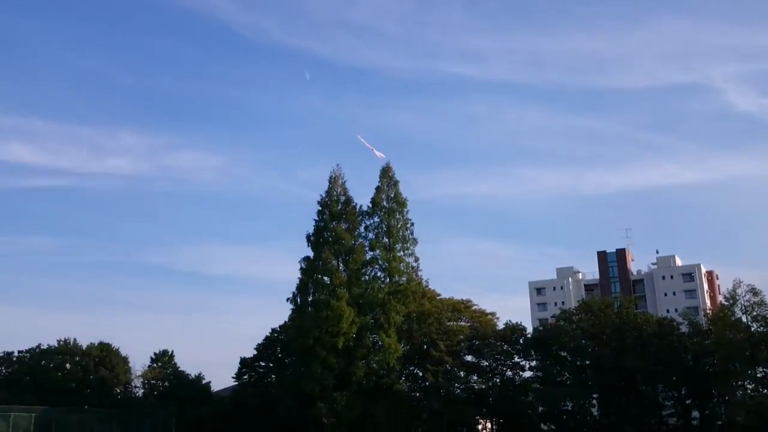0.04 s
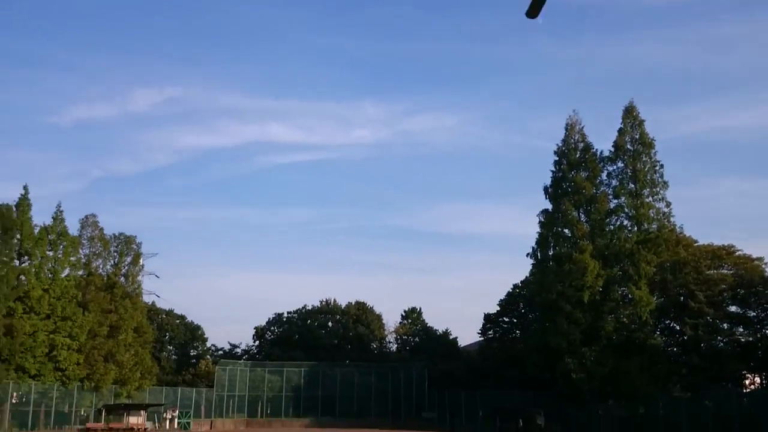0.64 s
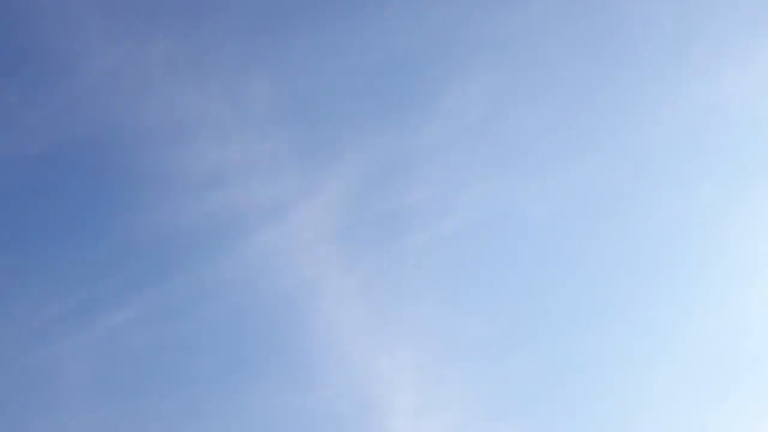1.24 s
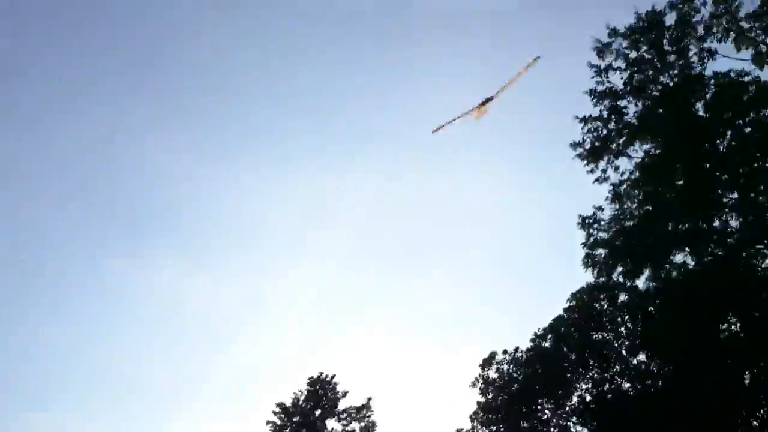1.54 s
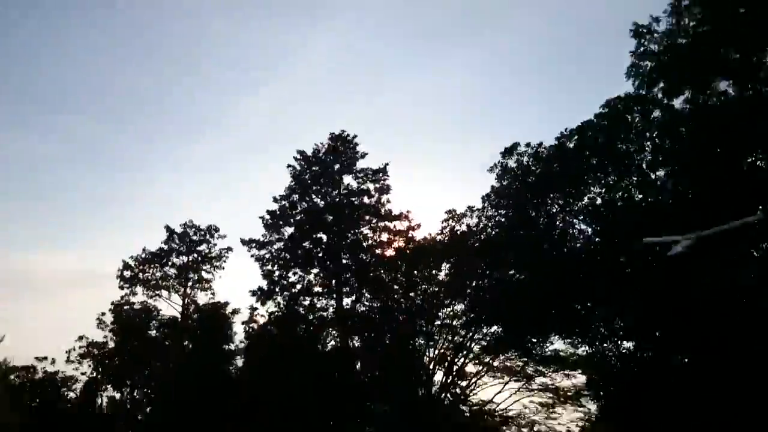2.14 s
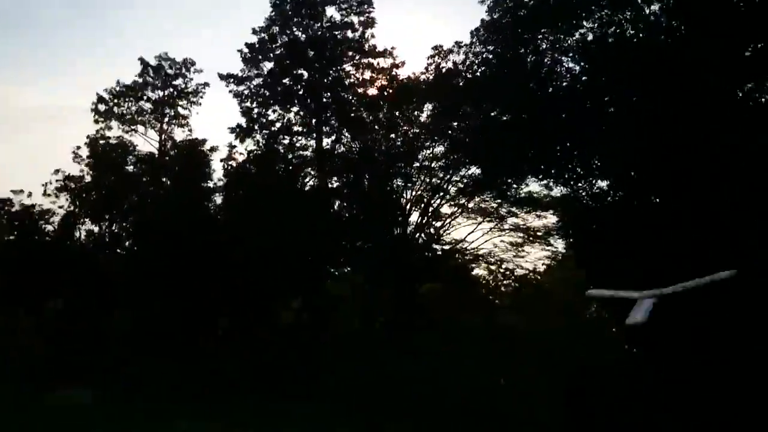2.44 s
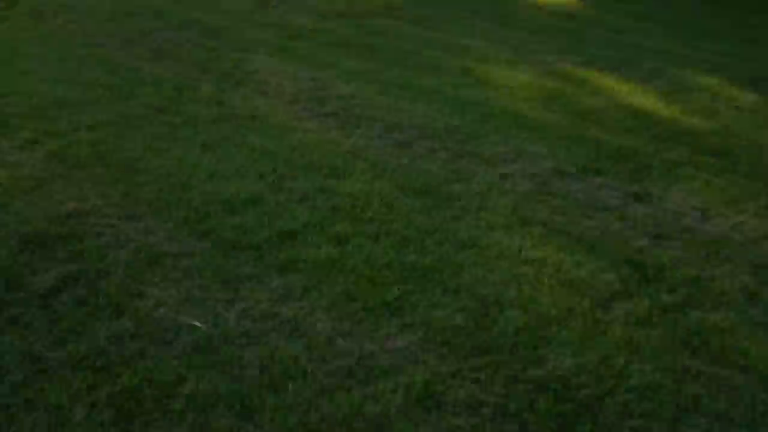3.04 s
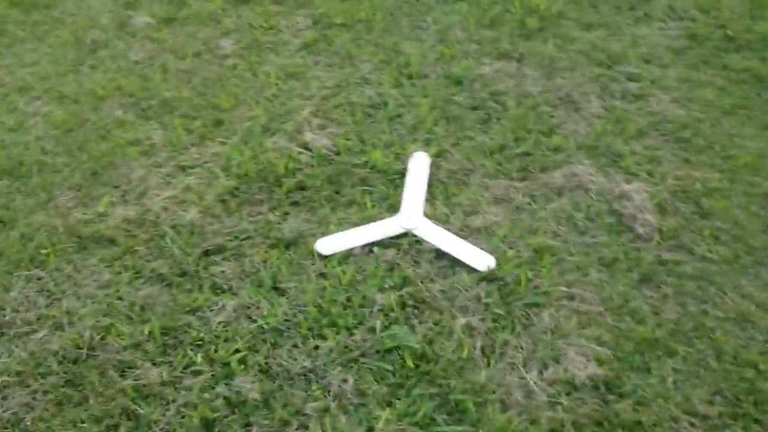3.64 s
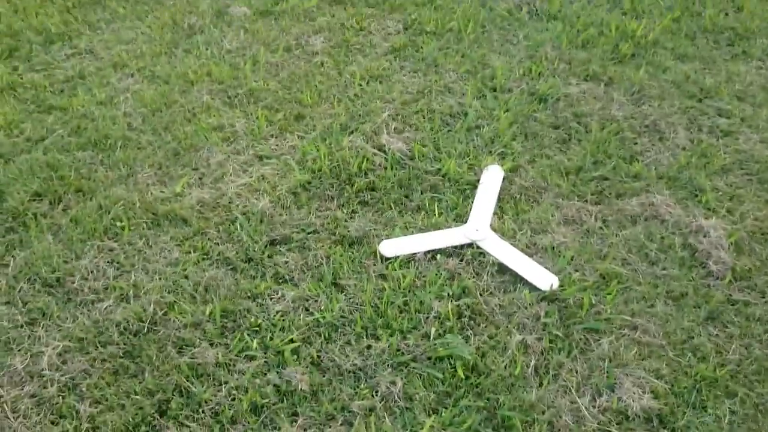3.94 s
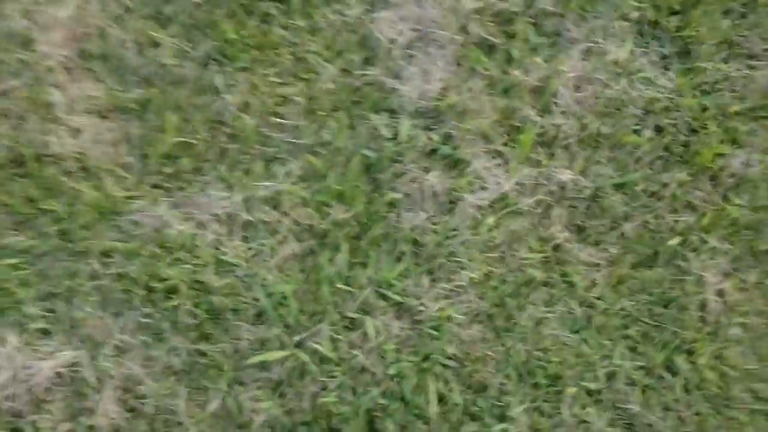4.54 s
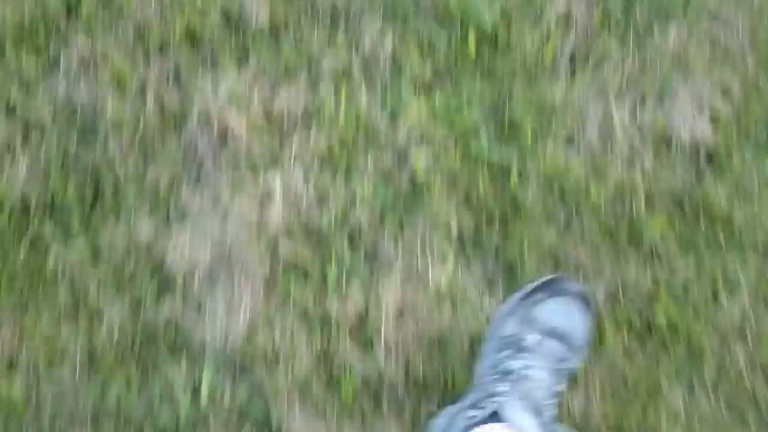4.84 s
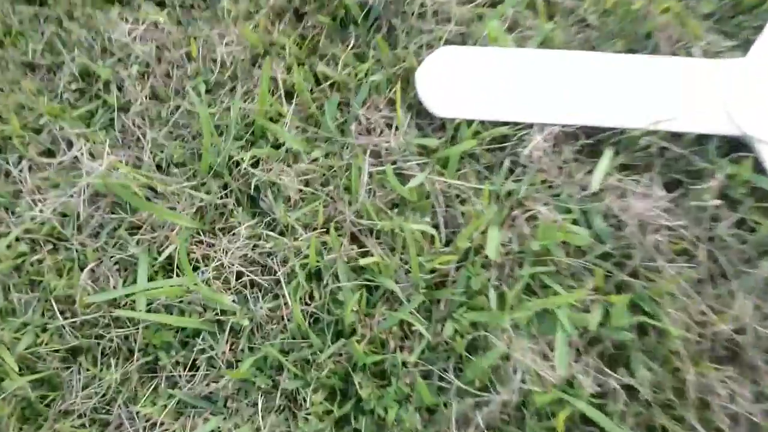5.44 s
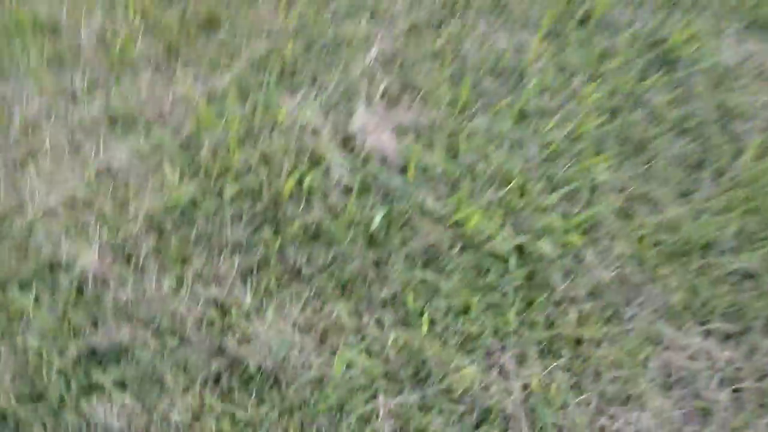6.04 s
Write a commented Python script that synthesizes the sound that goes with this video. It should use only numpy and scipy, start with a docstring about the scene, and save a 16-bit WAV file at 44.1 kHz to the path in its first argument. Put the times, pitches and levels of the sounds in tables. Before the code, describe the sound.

Wind buffets a hand-held stereo microphone throughout, in low, uneven rumbles and thumps that shift between sides, over a faint park hush and distant throbbing crickets. A strong gust hits the left around 0.3 seconds, a softer one the right near 1.9, and a finger bumps the microphone at 2.9. At 3.4 seconds a boomerang lands on the left with sharp ticks and a brief hissing skid through grass, along with more wind thumps. From 4 seconds clothes swish, and the far crickets give way to one soft, nearer trill. Loud finger knocks hit the right side at 4.5 and 4.8 seconds; the finger slides off and that side becomes clearer. Strong gusts follow from 5 to 5.6 seconds, with light shoe scuffs and dry stalk snaps near 5.1 and 5.4. Grass blades hiss from 5.7 to 6.1 as the boomerang is lifted, with one more snap around 6 seconds.

```python
"""Gusts buffet the two microphone ports of a swinging hand-held camera, over crickets and a far park hush.
A boomerang thrown on the evening lawn lands and skids through the grass. Clothes rustle, a shoe scuffs,
stalks snap and blades hiss as the thrower bends to fetch it. A finger muffles the right port, bumps the
housing and slides off; a near cricket takes over from the far ones."""
import sys
import numpy as np
from scipy import signal
from scipy.fft import rfft, irfft, next_fast_len
from scipy.io import wavfile
from scipy.ndimage import uniform_filter1d

SR = 44100
rng = np.random.default_rng(int(sys.argv[2]) if len(sys.argv) > 2 else 0)


def store_pcm(level_fs):
    """Save levels as 16-bit WAV."""
    pcm = np.round(np.clip(level_fs, -1, 1) * 32767).astype(np.int16)
    wavfile.write(sys.argv[1], SR, np.atleast_2d(pcm).T)


N = 276948
TIME_S = np.arange(N) / SR


def from_db(db):
    return 10 ** (np.asarray(db) / 20)


def unit_rms(x):
    return x / np.sqrt(np.mean(x ** 2) + 1e-20)


def curves(rows):
    """Each column interpolated over the times in the first."""
    times_s, *columns = np.transpose(rows)
    return [np.interp(TIME_S, times_s, column) for column in columns]


def swell(t_s, rise_s, hold_s, fall_s, power=1):
    """Full level from t_s; rise and fall each span 20 dB. Power 2 rounds the top."""
    flank = np.maximum(t_s - TIME_S, 0) / rise_s + np.maximum(TIME_S - t_s - hold_s, 0) / fall_s
    return from_db(-20 * flank ** power)


def drift(per_s):
    """Random wander, unit RMS."""
    knots = rng.standard_normal(N // 10)
    return unit_rms(np.interp(TIME_S * per_s, np.arange(len(knots)), knots))


def sine(hz):
    return np.sin(2 * np.pi * np.cumsum(hz) / SR)


def pan(side_db):
    """L and R gains from L-R; the louder side stays at 1."""
    return from_db([[min(side_db, 0)], [min(-side_db, 0)]])


def stereo_noise(coherence):
    common = np.sqrt(coherence) * rng.standard_normal(N)
    return common + np.sqrt(1 - coherence) * rng.standard_normal((2, N))


def colour(x, spectrum):
    """Filter by an outline of f/Hz, gain/dB."""
    hz, db = np.transpose(spectrum)
    size = next_fast_len(N)
    grid_hz = np.maximum(np.fft.rfftfreq(size, 1 / SR), 1)
    gain = from_db(np.interp(np.log(grid_hz), np.log(hz), db))
    return irfft(rfft(x, size) * gain, size)[..., :N]


def butter(x, hz, kind, order=2):
    return signal.sosfilt(signal.butter(order, hz, kind, fs=SR, output="sos"), x)


def resonate(x, hz, width_hz):
    r = np.exp(-np.pi * width_hz / SR)
    gain = (1 - r * r) / 2
    feedback = [1, -2 * r * np.cos(2 * np.pi * hz / SR), r * r]
    return signal.lfilter([gain, 0, -gain], feedback, x + 1e-18)


def band(x, hz, stage_width_hz):
    """Two equal resonators in series, unit RMS out."""
    return unit_rms(resonate(resonate(x, hz, stage_width_hz), hz, stage_width_hz))


def friction(spectrum, grain_db, coherence, slips_per_s=500):
    """Countless tiny uneven slips, coloured by what rubs."""
    slips = stereo_noise(coherence) * from_db(grain_db * drift(slips_per_s))
    return unit_rms(colour(slips, spectrum))


def puff(clicks, corner_hz):
    """Each click becomes a rounded pressure pulse."""
    return signal.sosfilt(signal.bessel(8, corner_hz, fs=SR, output="sos"), clicks + 1e-18)


def eddy(clicks, corner_hz):
    """A passing eddy pushes, then draws the air back."""
    return butter(puff(clicks, corner_hz), .27 * corner_hz, "high", order=1)


def mic_low_cut(x, hz=64, q=1.8):
    """The microphone's bass cut swings back after every pulse."""
    w = 2 * np.pi * hz / SR
    ringing = signal.lfilter(*signal.bilinear([1, 0, 0], [1, w / q, w * w], 1), x)
    return butter(ringing, 13, "high", order=1)


def pressure_pulses(table, shape, alternate):
    """Single pulses on the ports, placed and scaled by their peaks."""
    out = np.zeros((2, N))
    click = signal.unit_impulse(4096)
    for k, (t_s, db, corner_hz, side_db) in enumerate(table):
        pulse = mic_low_cut(shape(click, corner_hz))
        start = round(t_s * SR) - pulse.argmax()
        sign = (-1) ** k if alternate else 1
        out[:, start:start + len(click)] += sign * from_db(db) * pan(side_db) * pulse / pulse.max()
    return out


# Eddy sizes: corner/Hz, rate/(1/s), weight in strong wind/dB, loss in weaker wind/(dB/dB)
EDDY_SIZES = [(121.5, 820, 1, 1), (254, 170, 3, 1.76), (464, 70, -9.5, 2.17)]

def port_turbulence(flow_db, strong_db=-26, flutter_db=2.2):
    """Eddies hit one port; stronger flow brings more of the small, sharp ones."""
    lull_db = np.maximum(strong_db - flow_db, 0)
    rumble = 0
    for corner_hz, per_s, db, loss in EDDY_SIZES:
        clicks = (rng.random(N) < per_s / SR) * rng.uniform(-.88, 1, N)
        rumble += unit_rms(mic_low_cut(eddy(clicks, corner_hz))) * from_db(db - loss * lull_db)
    local_power = uniform_filter1d(uniform_filter1d(rumble ** 2, size=1500), size=1500)
    steady = rumble / np.sqrt(local_power + 1e-12)
    return steady * from_db(flow_db + flutter_db * drift(per_s=40))   # gusts break into puffs


# Gusts: t/s, rise/s, hold/s, fall/s, level/dB, L-R/dB
WIND_GUSTS = [(0.095, 0.11, 0.037, 0.033, -35, 8), (0.294, 0.089, 0.053, 0.16, -26, 36),
              (0.304, .3, 0.23, 0.3, -43.5, -17), (0.625, .06, 0.018, 0.17, -38.5, 18),
              (1.646, .025, 0.49, 0.22, -45, -3), (1.858, 0.23, 0.053, 0.24, -30, -13.5),
              (2.227, 0.03, 0.025, 0.15, -35.5, 13), (2.381, 0.043, 0.23, .04, -40, 3),
              (2.49, 0.047, .025, 0.042, -36.5, 17), (2.661, 0.022, .11, .12, -45, -1.5),
              (2.915, 0.062, 0.013, 0.12, -38, -2), (3.406, 0.11, 0.065, 0.063, -32, 16),
              (3.475, 0.16, 0.053, 0.5, -42, 2.5), (4.411, 0.049, 0.063, 0.33, -34.5, -7.5),
              (4.763, 0.031, 0.17, .13, -36, -10), (4.978, 0.055, 0.062, .12, -24.5, -10.5),
              (5.165, 0.082, 0.1, 0.26, -29, -2.5), (5.354, 0.051, .11, 0.068, -30, -15),
              (5.581, 0.075, 0.019, 0.2, -33.5, -16), (6.006, 0.23, .06, 0.075, -45.5, 16)]

def wind(calm_db=(-65, -55)):
    """Gusts add their power to the calm air at each port (L, R); the lee port gets less."""
    gust_power = sum((from_db(db) * pan(side_db) * swell(*shape, power=2)) ** 2
                     for *shape, db, side_db in WIND_GUSTS)
    flows_db = 10 * np.log10(gust_power + from_db(calm_db)[:, None] ** 2)
    return np.array([port_turbulence(flow_db) for flow_db in flows_db])


# Sharp eddies: t/s, peak/dB, corner/Hz, L-R/dB
WIND_JOLTS = [(.024, -29, 210, 32), (.58, -33.5, 204, -24), (2.13, -34.5, 136, -4), (1.645, -33, 240, 14),
              (3.573, -32.5, 240, 8), (.412, -22, 204, 28), (.233, -22.5, 318, 31), (.312, -15.5, 286, 39),
              (.352, -25.5, 960, 33), (.359, -14.5, 384, 32), (3.4205, -23, 330, 31),
              (3.445, -20.5, 574, 40), (3.4562, -16.5, 400, 40), (3.4794, -17.5, 343, 38),
              (4.4185, -24, 336, -30), (4.5185, -23, 298, 20), (4.979, -26, 296, -30),
              (5.043, -22.5, 406, -27), (5.052, -16.5, 306, -37), (5.107, -17.5, 457, -36),
              (5.248, -20.5, 307, 24), (5.328, -21, 332, -19), (5.617, -27, 239, -21)]

def wind_jolts():
    """Single sharp eddies thump the ports."""
    return pressure_pulses(WIND_JOLTS, eddy, alternate=False)


# Far park: f/Hz, gain/dB
PARK_SPECTRUM = [(150, 9.5), (400, -6), (900, 1.5), (1500, -0.5), (3000, -5.5), (4400, -3.5), (6400, -4),
                 (7300, -22.5), (8800, -16.5), (10300, -31), (12000, -24), (15800, -72)]

def park_hush():
    """Steady, wide noise of the distant park."""
    return from_db(-56) * unit_rms(colour(stereo_noise(coherence=.038), PARK_SPECTRUM))


# Chorus tones: f/Hz, weight/dB
CHORUS_TONES = [(4940, -2), (5135, 1), (5280, 0), (5470, -1), (5810, -5), (6160, -2)]
# Chorus fade: t/s, level/dB
CHORUS_FADE = [(0, -64), (3.7, -63.5), (6.28, -117)]

def far_crickets(waver_hz=24, haze_db=-2, throb_hz=14.47):
    """Wavering tones chirp in step over a haze of more distant singers."""
    level_db, = curves(CHORUS_FADE)
    song = sum(from_db(db) * np.array([sine(hz + waver_hz * drift(120)) for _ in range(2)])
               for hz, db in CHORUS_TONES)
    haze = unit_rms(butter(rng.standard_normal((2, N)), [5100, 6500], "band", order=4))
    throb = 1 + .62 * np.cos(2 * np.pi * throb_hz * (TIME_S - .04))
    return from_db(level_db) * unit_rms(song + from_db(haze_db) * haze) * throb


# Covered port: f/Hz, gain/dB
COVERED_RESPONSE = [(100, -5.5), (500, -4.5), (1200, -17.5), (3000, -6), (6000, -34), (12000, -4)]

def finger_muffle(x, opens_s=4.83, slide_s=.076):
    """A finger muffles the right port until it slides away."""
    left, right = x
    uncovered = np.clip((TIME_S - opens_s) / slide_s, 0, 1)
    return np.array([left, uncovered * right + (1 - uncovered) * colour(right, COVERED_RESPONSE)])


# Cloth body, swish and crisp top: f/Hz, gain/dB
BODY_SPECTRUM = [(450, -0.5), (900, -5), (1350, -6.5), (1900, -3), (2500, -5), (3800, -26.5)]
SWISH_SPECTRUM = [(2000, -17), (3300, -1), (3850, -2.5), (4400, -1), (5700, -0.5), (7000, -8), (9000, -26),
                  (11000, -38)]
CRISP_SPECTRUM = [(6000, -1.5), (8500, 6), (10000, -3), (12300, 13), (14000, 2), (15800, 9)]
# Walking up and bending, before trim: t/s, body/dB, swish/dB, crisp/dB
CLOTH_SLIDING = [(3.9, -100, -96, -98), (4.3, -84, -62, -89), (4.7, -63, -52, -67),
                 (5.0, -56, -50.5, -54.5), (5.3, -50.5, -46, -51.5), (5.5, -50, -43, -48.5),
                 (5.66, -64, -57.5, -58), (5.8, -73, -49, -56), (6.28, -82, -50, -48.5)]
# Quick limb moves, before trim: t/s, rise/s, hold/s, fall/s, level/dB, crisp re level/dB
LIMB_STROKES = [(0.392, 0.088, 0.018, 0.14, -60, -3), (0.58, 0.37, 0.13, 0.45, -58.5, -21),
                (4.502, 0.098, 0.033, 0.24, -54, -11), (4.754, 0.074, 0.048, 0.12, -56.5, -13),
                (5.143, .025, 0.02, 0.048, -44, -19), (5.387, 0.025, 0.02, 0.043, -46.5, 8)]

def cloth_rustle(trim_db=-1, side_db=3):
    """Folds give the body, sliding cloth the swish, its fibres the crisp top."""
    body, swish, crisp = from_db(curves(CLOTH_SLIDING))
    strokes = sum(from_db(db) * swell(*shape) for *shape, db, _ in LIMB_STROKES)
    tops = sum(from_db(db + top_db) * swell(*shape) for *shape, db, top_db in LIMB_STROKES)
    out = np.hypot(body, strokes) * friction(BODY_SPECTRUM, grain_db=1.5, coherence=.72)
    out += np.hypot(swish, strokes) * friction(SWISH_SPECTRUM, grain_db=1, coherence=.033)
    out += np.hypot(crisp, tops) * friction(CRISP_SPECTRUM, grain_db=1, coherence=.073)
    return from_db(trim_db) * out * pan(side_db)


def crackles(table, coherence):
    """Short bursts of slips, each in its own resonance."""
    out = 0
    for t_s, db, hz, width_hz, decay_s, side_db in table:
        burst = band(stereo_noise(coherence), hz, .64 * width_hz)
        envelope = (TIME_S >= t_s) * np.exp(-abs(TIME_S - t_s) / decay_s)
        out += from_db(db) * pan(side_db) * envelope * burst
    return out


# Fingertip crunches: t/s, level/dB, f/Hz, nominal width/Hz, decay/s, L-R/dB
FINGER_CRUNCHES = [(.562, -50, 730, 2520, 0.034, -30), (4.492, -40.5, 4050, 2400, 0.027, 23),
                   (4.501, -42, 545, 506, 0.048, -16), (4.8238, -19, 1020, 1730, 0.0029, -34),
                   (4.823, -29, 3200, 2980, 0.0037, -24), (4.8305, -32.5, 890, 2000, 0.0062, -32)]

def finger_crunches():
    """The fingertip crunches against the port."""
    return crackles(FINGER_CRUNCHES, coherence=1)


# Finger bumps: t/s, peak/dB, corner/Hz, L-R/dB
FINGER_BUMPS = [(2.8621, -20.5, 696, -35), (2.865, -30.5, 164.3, -32), (4.4982, -7.5, 750, -36),
                (4.5, -9.5, 537, -32), (4.8235, -5, 1150, -50), (4.825, -8, 288, -49),
                (4.831, -12, 630, -47)]

def finger_bumps():
    """The finger presses and releases the right port in turn."""
    return pressure_pulses(FINGER_BUMPS, puff, alternate=True)


# Sliding contact: f/Hz, gain/dB
SKID_SPECTRUM = [(1500, -14.5), (3000, -23), (3700, -12.5), (5670, -11), (7850, -17), (11000, -18.5),
                 (12100, -9), (15800, -13.5)]

def skids(table, ring_width_hz, low_cut_hz):
    """Crackly friction plus one resonance per touch, under a force that swells and dies."""
    slips = friction(SKID_SPECTRUM, grain_db=2.5, coherence=1, slips_per_s=3000)
    rub = unit_rms(butter(slips, low_cut_hz, "high"))
    blur = butter(rng.standard_normal(N), ring_width_hz / 2, "low")
    out = 0
    for t_s, db, rise_s, fall_s, ring_db, ring_hz in table:
        ring = from_db(ring_db) * unit_rms(blur * np.sin(2 * np.pi * ring_hz * TIME_S))
        force = np.exp(-np.maximum((t_s - TIME_S) / rise_s, (TIME_S - t_s) / fall_s))
        out += from_db(db) * force * (rub + ring)
    return out


# Ground touches: t/s, rub level/dB, rise/s, fall/s, ring re rub/dB, ring f/Hz
GROUND_TOUCHES = [(3.3802, -22, .0007, .0013, -16, 5500), (3.3985, -38.5, .0012, .003, 5, 5200),
                  (3.405, -32, .0004, .0009, -12, 3700), (3.413, -37, .004, .003, 1, 3700),
                  (3.424, -25.5, .006, .0065, -9, 4300), (3.4247, -17.5, .00025, .0006, -30, 4300),
                  (3.432, -34, .004, .007, 5, 4480), (3.448, -46, .05, .042, -2, 4400),
                  (3.63, -65, .07, .04, 7, 4200)]

def boomerang_landing():
    """The boomerang touches down and skids; the grass blades give little bass."""
    return skids(GROUND_TOUCHES, ring_width_hz=700, low_cut_hz=3000) * pan(side_db=31)


# Ribbed cloth, legs passing: t/s, start f/Hz
FOLD_WHISTLES = [(4.165, 2630), (4.18, 3550), (4.19, 1450), (4.295, 1800), (4.305, 2480), (4.525, 790)]

def cloth_whistles(level_db=-66, length_s=.125, glide_ratio=1.2, blur_hz=70, side_db=9):
    """Threads tick over each other faster as the leg speeds up; each fold has its own pitch."""
    out = 0
    for t_s, start_hz in FOLD_WHISTLES:
        progress = np.clip((TIME_S - t_s) / length_s, 0, 1)
        tone = sine(start_hz * glide_ratio ** progress)
        blur = butter(rng.standard_normal(N), blur_hz, "low")
        out += np.sin(np.pi * progress) * unit_rms(tone * blur)
    return from_db(level_db) * out * pan(side_db)


# Near cricket: t/s, f/Hz, pulse rate/(1/s), level/dB
CRICKET_SONG = [(4.45, 4990, 37.6, -75), (4.57, 4995, 37.6, -59.5), (5.1, 5085, 37, -58.5),
                (5.55, 5065, 36.3, -58), (6.28, 5150, 35, -54.5)]

def near_cricket(waver_hz=32, flicker_db=2):
    """Each wing stroke gives a pulse of almost pure tone; the gaps stay partly filled."""
    hz, per_s, db = curves(CRICKET_SONG)
    strokes = 1 + .85 * sine(per_s)
    tone = sine(hz + waver_hz * drift(160))
    return unit_rms(strokes * tone) * from_db(db + flicker_db * drift(26))


# Housing modes: f/Hz, width/Hz, gain/dB
HOUSING_MODES = [(1720, 2270, 11.5), (2840, 350, 4)]

def housing_tap(t_s=4.4974, drive_db=-11.5, contact_hz=3250, side_db=-17.5):
    """A fingertip briefly rings the housing; its softness dulls the top."""
    click = from_db(drive_db) * pan(side_db) * signal.unit_impulse(N, round(t_s * SR))
    ring = sum((-1) ** k * from_db(db) * resonate(click, hz, width_hz) * SR / (2 * np.pi * width_hz)
               for k, (hz, width_hz, db) in enumerate(HOUSING_MODES))
    return butter(ring, contact_hz, "low", order=3)


# Finger leaving: t/s, rub level/dB, rise/s, fall/s, ring re rub/dB, ring f/Hz
FINGER_RUB = [(4.938, -40.5, 0.02, 0.004, 3.5, 5430)]

def finger_slide():
    """The finger rubs the right port as it slides off."""
    return skids(FINGER_RUB, ring_width_hz=2200, low_cut_hz=900) * pan(side_db=-35)


# Stalk snaps: t/s, level/dB, f/Hz, nominal width/Hz, decay/s, L-R/dB
STALK_SNAPS = [(5.143, -43, 11000, 9000, .002, 5), (5.391, -30.5, 6300, 8000, .003, 9),
               (6.041, -32.5, 3300, 4300, .0033, 8)]

def stalk_snaps():
    """Dry stalks break with short, bright cracks."""
    return crackles(STALK_SNAPS, coherence=.1)


# Scuffs while crouching: t/s, rise/s, hold/s, fall/s, level/dB, f/Hz
SOLE_SCUFFS = [(5.149, .015, .008, .07, -47, 2130), (5.388, .015, .03, .04, -45.5, 1020),
               (5.41, .03, .16, .16, -53.5, 2130), (5.44, .25, .08, .2, -56, 1720)]

def shoe_scuffs(slips_per_s=500, side_db=-2):
    """The sole sticks and slips unevenly; each slip rings one narrow resonance."""
    out = 0
    for *shape, db, hz in SOLE_SCUFFS:
        slips = (rng.random(N) < slips_per_s / SR) * stereo_noise(coherence=.41)
        out += from_db(db) * swell(*shape) * band(slips, hz, stage_width_hz=230)
    return out * pan(side_db)


# Blade hiss: f/Hz, gain/dB
BLADE_SPECTRUM = [(3000, -30), (5500, 3.5), (8700, 1), (10000, -5), (12000, 5.5), (15800, 4)]
# Picking up the boomerang: t/s, rise/s, hold/s, fall/s, drive/dB
PICKUP_SWEEPS = [(5.672, .012, 0.016, 0.021, -45.5), (5.872, 0.21, 0.055, 0.031, -36.5),
                 (6.114, 0.024, 0.016, 0.027, -45)]

def grass_sweeps(crunch_db=2.2, clumps_per_s=260, side_db=1):
    """Swept blades hiss; stalks crunch in clumps along the boomerang's arm, even when it moves slowly."""
    sweep = sum(from_db(db) * swell(*shape) for *shape, db in PICKUP_SWEEPS)
    blades = from_db(-4) * friction(BLADE_SPECTRUM, grain_db=1, coherence=.043)
    swish = from_db(-30) * friction(SWISH_SPECTRUM, grain_db=2, coherence=.052)
    scrape = from_db(-28) * band(stereo_noise(coherence=.078), hz=3950, stage_width_hz=840)
    stalks = (swish + scrape) * unit_rms(from_db(crunch_db * drift(clumps_per_s)))
    return (sweep * blades + np.sqrt(sweep) * stalks) * pan(side_db)


def scene():
    """Park and thrower pass the finger's muffling; landing, wind and handling add directly."""
    park = park_hush() + far_crickets() + near_cricket()
    thrower = cloth_rustle() + shoe_scuffs() + cloth_whistles() + grass_sweeps() + stalk_snaps()
    landing = boomerang_landing()
    buffeting = wind() + wind_jolts()
    handling = finger_bumps() + housing_tap() + finger_crunches() + finger_slide()
    return finger_muffle(park + thrower) + landing + buffeting + handling


def record(dry):
    """Faint microphone hiss, then a steep treble cut."""
    hiss_db, cutoff_hz = -67, 15900
    # f/Hz, gain/dB
    hiss_spectrum = [(500, 11), (6500, 4), (7500, -.5), (10300, -8.5), (12000, -.5), (16000, -3)]
    hiss = from_db(hiss_db) * unit_rms(colour(rng.standard_normal((2, N)), hiss_spectrum))
    return signal.sosfilt(signal.ellip(12, .1, 80, cutoff_hz, fs=SR, output="sos"), dry + hiss)


dry = scene()
out = record(dry)
store_pcm(out)
```